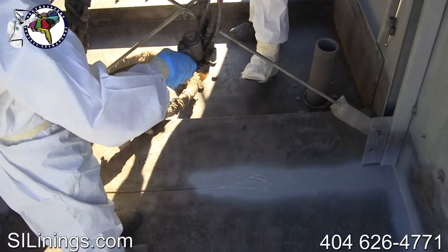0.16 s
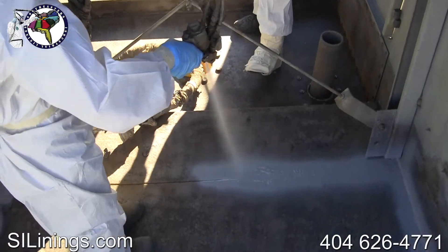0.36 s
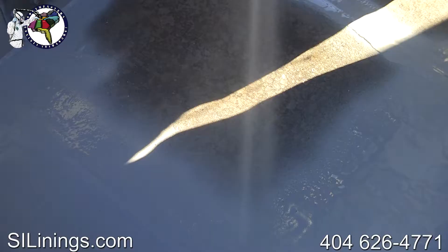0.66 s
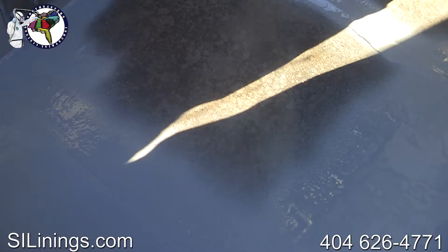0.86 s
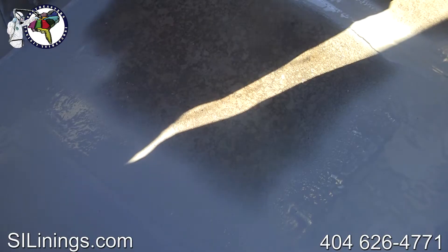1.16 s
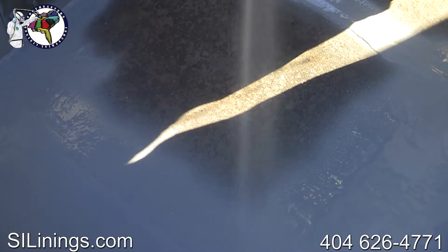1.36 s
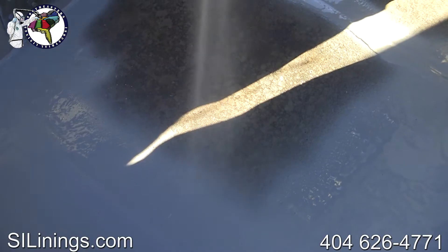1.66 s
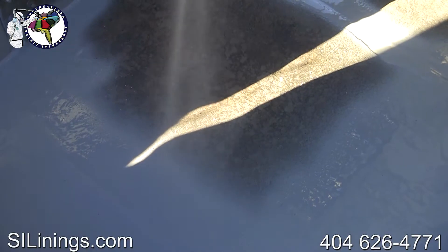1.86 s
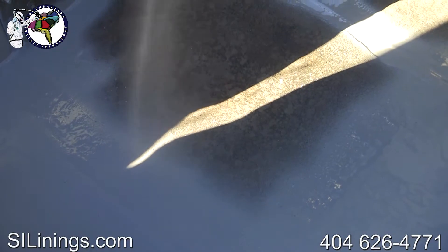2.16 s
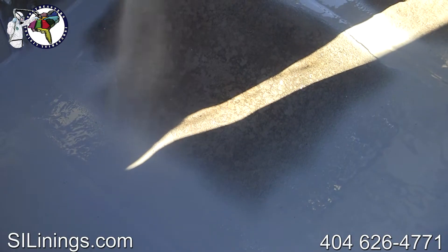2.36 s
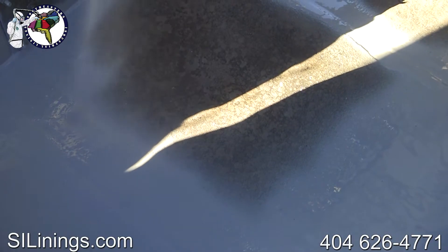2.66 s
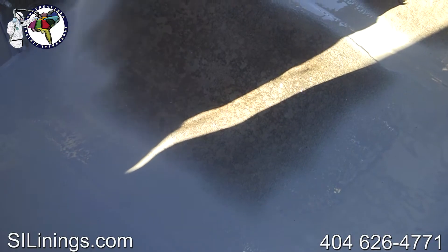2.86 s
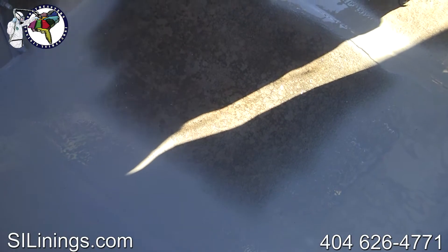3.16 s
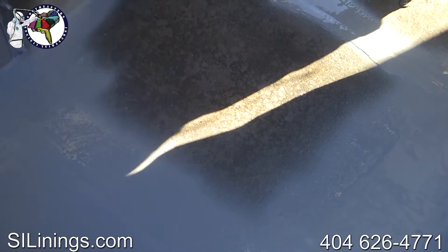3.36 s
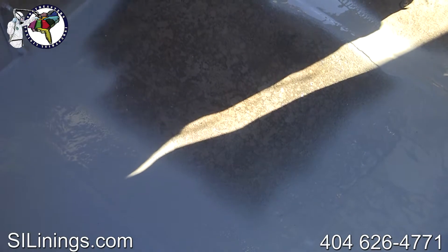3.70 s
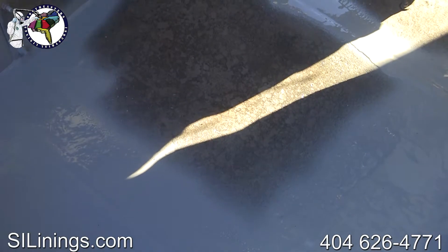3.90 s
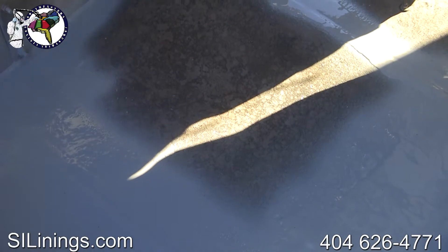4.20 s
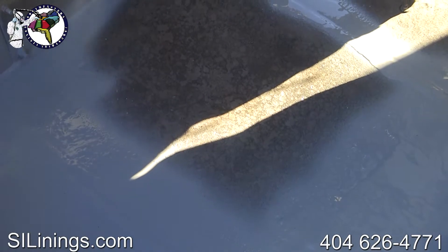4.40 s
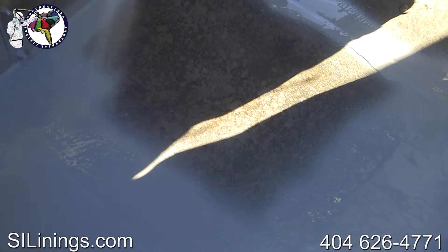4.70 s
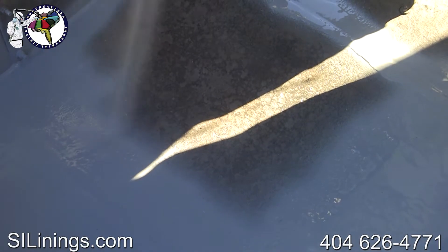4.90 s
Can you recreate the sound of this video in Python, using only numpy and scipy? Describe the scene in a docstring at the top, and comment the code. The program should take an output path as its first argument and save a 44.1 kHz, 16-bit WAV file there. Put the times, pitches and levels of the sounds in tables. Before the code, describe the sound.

Steady bright spray-gun hiss over a low compressor drone, with paired sharp air puffs from a pump about once a second.

```python
"""First spot: an airless spray gun hisses as it coats a steel floor, beside a compressor's hum and rumble.
At once the paint pump's air motor reverses, and two loud puffs ring its muffler and hiss through its port.
At 0.675 s the scene cuts to a place beside the spray fan; the pump reverses about once a second.
The camera's gain control ducks at each puff and creeps back, so the steady noise-band hiss swells in passes.
In the last fifth of a second the fan swings back towards the camera and its hiss rises."""
import sys
import numpy as np
from scipy import signal
from scipy.fft import rfft, irfft
from scipy.io import wavfile
from scipy.ndimage import uniform_filter1d

SR = 44100
rng = np.random.default_rng(int(sys.argv[2]) if len(sys.argv) > 2 else 0)


def master_out(mix):
    """Clip the mix to full scale and print it as 16-bit PCM to the path in sys.argv[1]."""
    frames = np.transpose(np.atleast_2d(mix))
    ceiling = np.clip(frames, -1, 1)
    pcm = np.round(ceiling * 32767).astype(np.int16)
    wavfile.write(sys.argv[1], SR, pcm)


N = 222537
TIME = np.arange(N) / SR  # s
FREQS = np.maximum(np.fft.rfftfreq(N, 1 / SR), 1)  # Hz, kept above 0 for the logarithms

# Microphone pair, likeness of left and right: (frequency [Hz], coherence [0-1 after clipping])
MICROPHONE_LIKENESS = [(60, 1.8), (130, 0.9), (290, 1), (640, 2.5), (1400, .5), (3100, 0.17), (6800, 0.1),
                       (15000, 0)]
# Microphone pair, tilt of the stereo image: (frequency [Hz], left minus right [dB])
MICROPHONE_BALANCE = [(60, -1.5), (200, -3), (700, -3), (1300, -4), (2400, -1), (4400, -1), (6000, -1),
                      (8500, -4), (12000, -8.5), (15000, -7)]
# Spectrum of the nozzle hiss: (frequency [Hz], relative density [dB per Hz])
HISS_SPECTRUM = [(150, -21), (500, -8), (620, -3), (880, -1), (1130, -2.5), (1420, 0.5), (1720, -3),
                 (2200, 0.4), (3120, 1), (4600, 1.2), (7500, 0.76), (11500, 0), (13200, -0.6),
                 (15700, -3.5)]
# Spectrum of the compressor drone: (frequency [Hz], relative density [dB per Hz])
DRONE_SPECTRUM = [(15, -55), (25, -50), (44, -13), (73, -8), (102, -1.5), (139, -2.5), (168, 0.5), (219, 1),
                  (276, -5.5), (317, -5.5), (409, -6.5), (441, -13.5), (520, -14.5), (680, -61),
                  (1140, -120)]
# Air resonances of the steel enclosure: (frequency [Hz], half-width at -6 dB [Hz], relative level [dB])
ENCLOSURE_MODES = [(61.6, 6, -3), (85.5, 4.4, 1.5), (114, 19, -0.5), (165, 15.6, -0.5), (212.3, 2.4, 3),
                   (243.4, 8.7, 2.5), (307, 12.5, -6.5), (593, 54, -10.5)]
# Spectrum of the pump's exhaust air: (frequency [Hz], relative density [dB per Hz])
EXHAUST_SPECTRUM = [(200, -35), (500, -13.5), (900, -8.5), (1400, -1.5), (2300, 0), (3200, -1.5), (6000, 5),
                    (9000, 1.5), (13000, -8), (16000, -12)]
# Sizzle of the exhaust's fastest jet: (frequency [Hz], relative density [dB per Hz])
SIZZLE_SPECTRUM = [(1000, -34), (2500, -15), (4000, -14), (7000, -5.5), (9500, -2), (12000, 1.5),
                   (14000, -1.5), (16000, -4)]
# Muffler resonances: (frequency [Hz], half-width at -6 dB [Hz], level before the ring tilt [dB])
MUFFLER_MODES = [(1300, 74, -11.5), (1590, 71, -5.5), (1773, 41, 3), (1947, 70, -2), (2330, 200, -13),
                 (2890, 83, -1), (3210, 220, -0.5), (3670, 470, -4.5), (4570, 110, 1.5), (6340, 180, -4.5),
                 (9500, 870, -13)]
# First blast of each pump reversal:
# (time [s], air level [dB], muffler ring over air [dB], ring pitch [ratio], duration [factor])
FIRST_BLASTS = [(.009, -14.8, -4.5, 1.01, 0.89), (0.697, -18, 1.2, 1.01, 0.81),
                (1.59, -16.5, 1.1, 0.99, 0.94), (2.529, -18.5, -0.3, 0.97, 1.01),
                (3.641, -20, 1.2, 0.992, 0.98), (4.652, -17, 2, 0.99, 0.97)]
# Second puff, as the valve seats: (time [s], air level [dB], duration [factor])
SECOND_PUFFS = [(.224, -14.5, 2.22), (.819, -15.5, 0.97), (1.721, -14, 1.05), (2.665, -15, 1.13),
                (3.769, -16.5, 1.02), (4.770, -15, 0.89)]

# Shape of each kind of puff, times before the duration factor:
# (rise [s], hold [s], ring tilt [dB per octave], sizzle over air [dB])
BLAST_FORM = (0.0455, 0.03, -2.6, 8.5)
SECOND_FORM = (0.019, 0.042, 1.9, 0.68)
LEAK_FORM = (0.08, -0.01, 7, -3)  # starts to empty before it is fully open
SECOND_RING = (-6, 0.95)  # (muffler ring over air [dB], ring pitch [ratio])
LEAK = (0.14, -31, 12)  # (time [s], air level [dB], muffler ring over air [dB])

# Levels ahead of the gain control: (at the first spot [dB], beside the fan [dB])
SPRAY_DB = (-26.8, -25.5)
SPRAY_TILT_DB = (3.5, 1)  # treble up and bass down by this much
RUMBLE_DB = (-44.5, -40.5)
HUM_DB = (-48, -60)
SIZZLE_DB = (3.5, 0)  # added to each puff's own; the fastest jet points more at the first spot
PUMP_PAN_DB = (0.6, -0.6)  # left minus right, on top of the microphone balance

CUT_S = 0.675
RETURN_S, RETURN_DB_PER_S = 4.83, 13  # the fan swings back towards the camera
HUM_HZ = 77.4
TOP_HZ = 15850


def undb(db):
    """Decibels to gain."""
    return 10 ** (np.asarray(db) / 20)


def along(points):
    """A table of (frequency, value) at every frequency, joined on a log axis."""
    hz, value = np.transpose(points)
    return np.interp(np.log(FREQS), np.log(hz), value)


def at_spot(before, after):
    """One value at the first spot and another from the cut on."""
    return np.where(TIME < CUT_S, before, after)


def walk(rate_hz):
    """Random levels, held one period each and smoothed twice; standard deviation 1."""
    hold = int(SR / rate_hz)
    steps = np.repeat(rng.standard_normal(N // hold + 1), hold)
    slow = uniform_filter1d(uniform_filter1d(steps, hold), hold)[:N]
    return slow / np.std(slow)


def pan(db):
    """Gains of the left and right channel for a level difference."""
    return undb(np.array([[1], [-1]]) * db / 2)


def resonances(modes, pitch=1):
    """Gain of steep-sided resonances at every frequency; their powers add."""
    power = 0
    for hz, half_width_hz, db in modes:
        ratio = FREQS / (hz * pitch)
        detune = (ratio - 1 / ratio) * hz / (2 * half_width_hz)
        power = power + (undb(db) / (1 + detune ** 2)) ** 2
    return np.sqrt(power)


def turbulence(gain):
    """Coloured stereo noise, rms 1: alike at both microphones in the bass, nearly unrelated in the treble."""
    mid, side = rfft(rng.standard_normal((2, N)))
    alike = np.clip(along(MICROPHONE_LIKENESS), 0, 1)
    shared = mid * np.sqrt(1 + alike)
    separate = np.array([[1], [-1]]) * side * np.sqrt(1 - alike)
    spectrum = (shared + separate) * gain * pan(along(MICROPHONE_BALANCE))
    noise = irfft(spectrum, N)
    return noise / np.std(noise)


def walls(source, echo_db, sway_s, shortest_s=0.002, longest_s=0.022, count=4):
    """Short echoes off the steel walls comb the noise; the comb slides when the source moves."""
    heard = source.copy()
    for channel in range(2):
        for lag_s in rng.uniform(shortest_s, longest_s, count):
            left_source_s = TIME - lag_s - sway_s * walk(1.5)
            index = np.round(left_source_s * SR).astype(int) % N
            heard[channel] += undb(echo_db) * source[channel, index]
    return heard / np.sqrt(1 + count * undb(echo_db) ** 2)


def spray(flutter_db=0.5, pivot_hz=6000):
    """Paint tears into mist at steady pressure; the fan flutters, and echoes shift as the gun sweeps."""
    return_db = RETURN_DB_PER_S * np.maximum(TIME - RETURN_S, 0)
    level_db = at_spot(*SPRAY_DB) + return_db
    tilt_db = at_spot(*SPRAY_TILT_DB)
    hiss = walls(turbulence(undb(along(HISS_SPECTRUM))), echo_db=-11, sway_s=0.00012)
    low = signal.sosfilt(signal.butter(1, pivot_hz, fs=SR, output="sos"), hiss)
    tilted = low * undb(-tilt_db) + (hiss - low) * undb(tilt_db)
    return tilted * undb(level_db + flutter_db * walk(30.07))


def compressor(boom_db=-2, throb_db=0.5, wander=0.0047):
    """The machine hums at its firing rate; its rumble throbs and booms in the steel enclosure."""
    drone = turbulence(undb(along(DRONE_SPECTRUM)))
    boom = undb(boom_db) * turbulence(resonances(ENCLOSURE_MODES))
    rumble = (drone + boom) / np.std(drone + boom)
    throb = undb(at_spot(*RUMBLE_DB) + throb_db * walk(35))
    firing_hz = HUM_HZ * (1 + wander * walk(5.8))
    hum = np.sqrt(2) * np.sin(2 * np.pi * np.cumsum(firing_hz) / SR)  # rms 1
    return rumble * throb + pan(-1.1) * hum * undb(at_spot(*HUM_DB))


def valve(age, rise, hold, t60, tail_db=-24, tail_t60=0.22):
    """A puff's envelope: the port opens, air flows, the cylinder empties, and the walls ring on."""
    opening = np.clip(age / rise, 0, 1) ** 2
    emptied = np.maximum(age - rise - hold, 0)
    flow = undb(-60 * emptied / t60)
    tail = undb(tail_db - 60 * emptied / tail_t60)
    return opening * np.hypot(flow, tail)


def pump(air_t60=0.18, sizzle_t60=0.12, ring_t60=0.24, ring_lead_s=0.0057,
         air_sputter_db=0.1, sizzle_sputter_db=1.0, ring_sputter_db=1.0):
    """Each reversal blasts air that rings the muffler, then a plainer second hiss; all of it sputters."""
    air = turbulence(undb(along(EXHAUST_SPECTRUM)))
    air = walls(air, echo_db=-6, sway_s=0, shortest_s=0.001, longest_s=0.009)
    air = air * undb(air_sputter_db * walk(87))
    sizzle_level_db = at_spot(*SIZZLE_DB) + sizzle_sputter_db * walk(90)
    sizzle = turbulence(undb(along(SIZZLE_SPECTRUM))) * undb(sizzle_level_db)
    ring_sputter = undb(ring_sputter_db * walk(70))

    def puff(form, start_s, air_db, ring_db, pitch=1, duration=1):
        """Air, sizzle and muffler ring through one opening of the valve."""
        rise_s, hold_s, tilt_db, sizzle_db = form
        age, rise, hold = TIME - start_s, rise_s * duration, hold_s * duration
        ring_gain = resonances(MUFFLER_MODES, pitch) * undb(tilt_db * np.log2(FREQS))
        ring = turbulence(ring_gain) * ring_sputter
        out = air * valve(age, rise, hold, air_t60)
        out = out + undb(sizzle_db) * sizzle * valve(age, rise, hold, sizzle_t60)
        # the first air through the barely open port already sounds the muffler
        out = out + undb(ring_db) * ring * valve(age + ring_lead_s, rise, hold, ring_t60)
        return undb(air_db) * out

    blasts = sum(puff(BLAST_FORM, *row) for row in FIRST_BLASTS)
    # air leaks through the muffler before the slowest puff
    leak = puff(LEAK_FORM, *LEAK)
    seconds = sum(puff(SECOND_FORM, start_s, air_db, *SECOND_RING, duration)
                  for start_s, air_db, duration in SECOND_PUFFS)
    return pan(at_spot(*PUMP_PAN_DB)) * (blasts + leak + seconds)


def scene():
    """Gun, compressor and pump together at the microphones."""
    return spray() + compressor() + pump()


def gain_control(sound, ceiling_db, release_db_per_s, sense_s, start_db=0, ratio=15):
    """Turns down above the ceiling, and comes back at a steady rate in dB."""
    pole = np.exp(-1 / (sense_s * SR))
    power = signal.lfilter([1 - pole], [1, -pole], np.mean(sound ** 2, axis=0))
    excess_db = 10 * np.log10(np.maximum(power / undb(ceiling_db) ** 2, 1))
    wanted_db = excess_db * (1 - 1 / ratio)
    recovery_db = release_db_per_s * np.arange(len(power)) / SR
    # a running maximum on a rising ramp falls back at the release rate
    held_db = np.maximum.accumulate(np.maximum(wanted_db + recovery_db, -start_db))
    return sound * undb(recovery_db - held_db)


def shot(sound, start_db):
    """A slow gain rider, then a quick limiter for the fronts of the puffs."""
    ridden = gain_control(sound, ceiling_db=-25.5, release_db_per_s=24.5, sense_s=0.013, start_db=start_db)
    return gain_control(ridden, ceiling_db=-24.0, release_db_per_s=100, sense_s=0.0025)


def record(dry):
    """Each spot has its own run of the gain control; a steep low-pass ends the treble just below 16 kHz."""
    first, second = np.split(dry, [int(CUT_S * SR)], axis=1)
    shots = np.hstack([shot(first, start_db=-10.0), shot(second, start_db=-1.5)])
    low_pass = signal.ellip(12, 0.1, 80, TOP_HZ, fs=SR, output="sos")
    return signal.sosfilt(low_pass, shots)


dry = scene()
out = record(dry)
master_out(out)
```